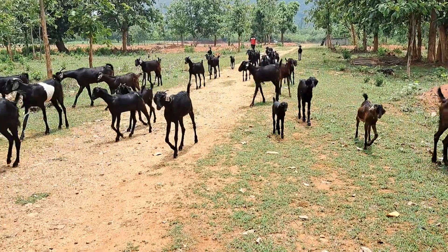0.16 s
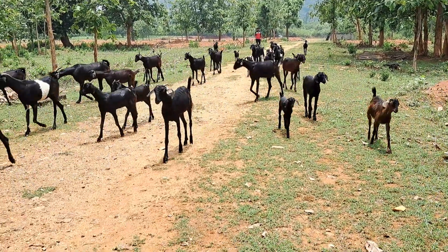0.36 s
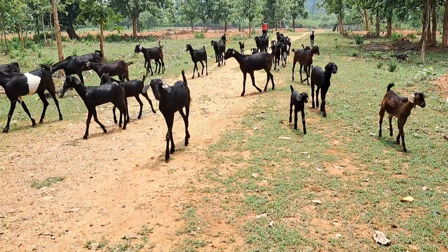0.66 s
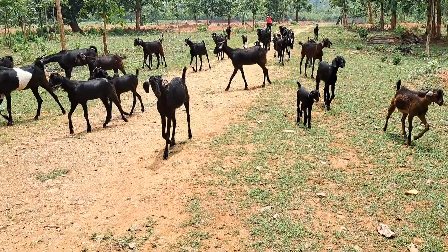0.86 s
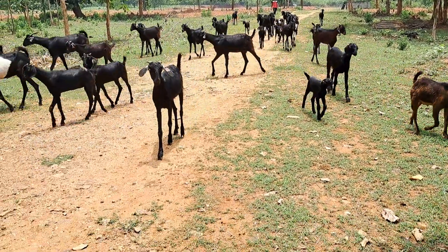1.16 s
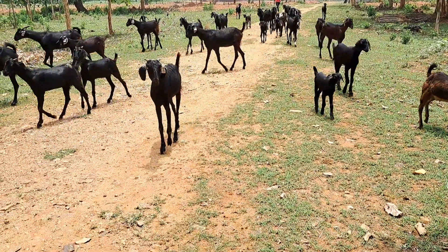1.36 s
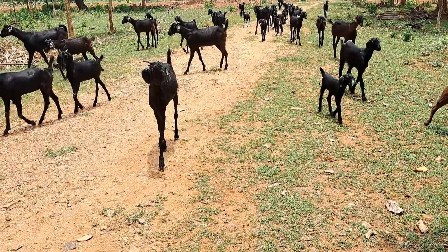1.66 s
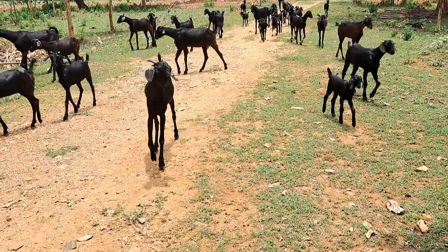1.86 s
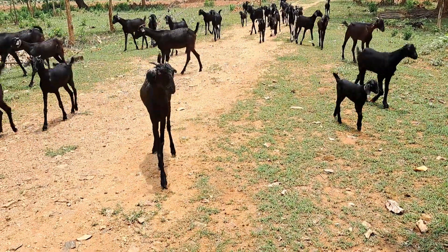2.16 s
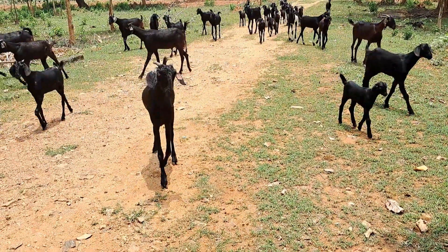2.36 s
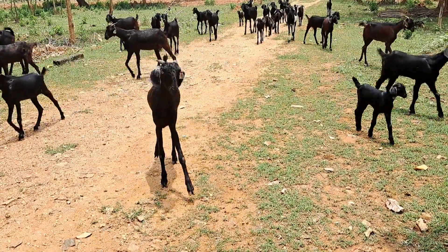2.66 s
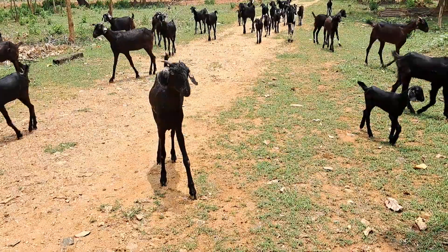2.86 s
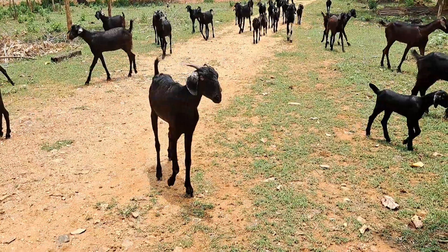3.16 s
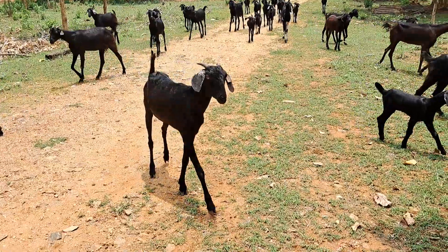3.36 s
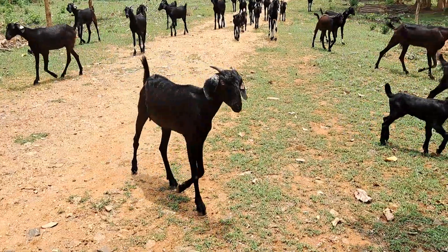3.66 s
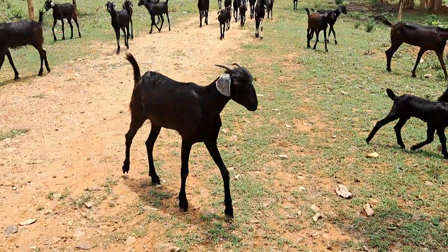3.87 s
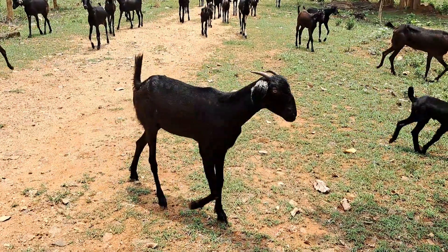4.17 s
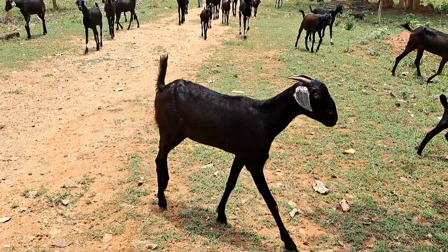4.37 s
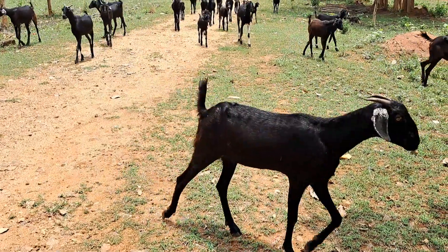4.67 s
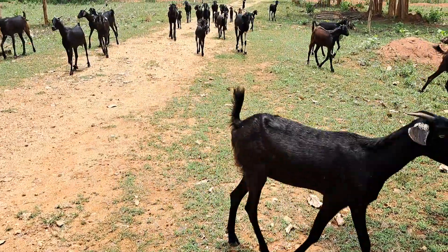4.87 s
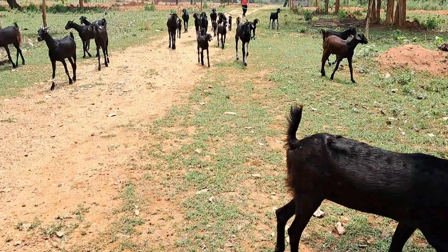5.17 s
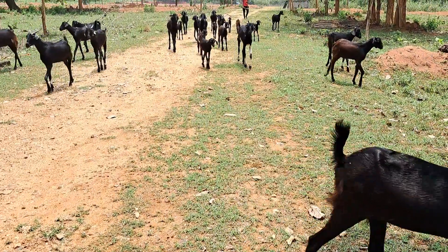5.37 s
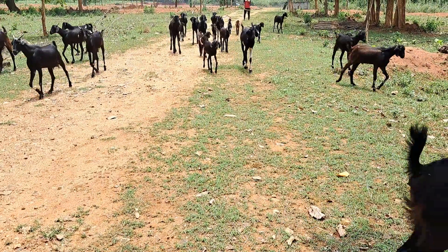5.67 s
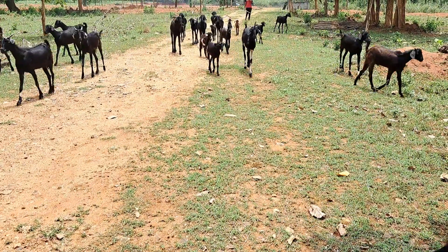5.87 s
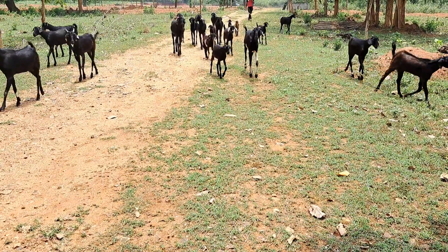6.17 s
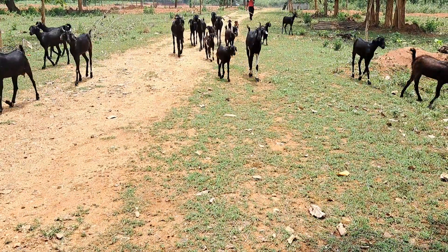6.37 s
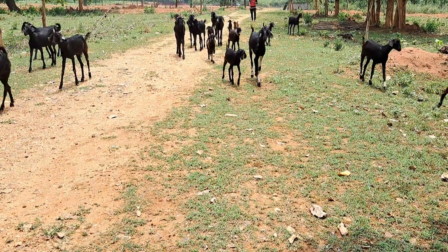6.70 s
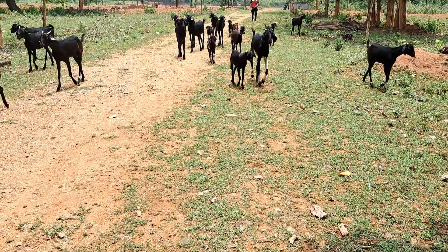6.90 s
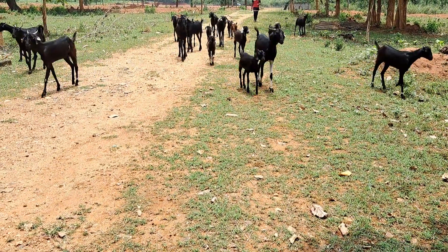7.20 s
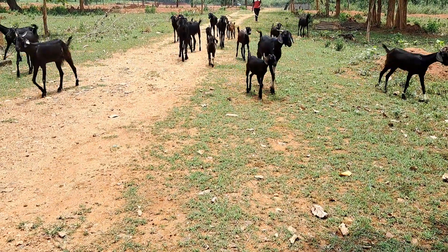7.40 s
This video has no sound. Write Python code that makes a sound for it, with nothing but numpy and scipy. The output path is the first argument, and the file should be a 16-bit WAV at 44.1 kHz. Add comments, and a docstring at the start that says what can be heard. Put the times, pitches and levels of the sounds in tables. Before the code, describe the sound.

Outdoors on a dry dirt track, a herd of goats shuffles past with fine gritty crackle, leg brushes through grass and small snapping stalks. Light wind thumps the stereo microphone early, with soft dull patter and faint bird whistles. A short, quiet, trembling bleat comes just after the middle. Then the footwork grows much closer and louder, with crisp crunches, dull thuds and renewed low rumble.

```python
"""A herd of goats walks along a dry dirt track: filtered grains and noise shuffle, hooves crunch and thud.
Legs brush through grass and leaves as swells of grit noise; dry stalks snap as short ringing bursts.
One goat passes close by with a soft, quavering bleat, harmonics shaped by nose and throat.
Gliding sine tones make birds whistle from the trees, and soft puffs patter in two early runs.
Low noise and single thumps rumble on the two-port microphone: light wind early, later probably handling."""
import sys
import numpy as np
from scipy import signal
from scipy.fft import rfft, irfft, next_fast_len
from scipy.io import wavfile
from scipy.ndimage import uniform_filter1d

SR = 44100
rng = np.random.default_rng(int(sys.argv[2]) if len(sys.argv) > 2 else 0)


def waveform_to_disk(signal):
    """Save audio, clipped to [-1, 1], as 16-bit WAV at the path in sys.argv[1]."""
    frames = np.transpose(np.atleast_2d(signal))
    scaled = np.clip(frames, -1, 1) * 32767
    samples = np.round(scaled).astype(np.int16)
    wavfile.write(sys.argv[1], SR, samples)


N = 332514
TIME = np.arange(N) / SR
HERD_LAG_S = -.00046   # the left port hears the herd earlier

# colour of grit crunching close by: (frequency [Hz], level per frequency [dB])
GRIT = [(710, -20), (1200, -9), (2060, -1), (2980, -0.5), (4360, -2), (4800, -2.5), (6510, -0.5), (7330, 0),
        (8170, -4.5), (9110, -8.5), (9930, -4), (10800, -7), (11900, -4), (15200, -8.5), (16000, -49)]


def from_db(db):
    """Decibels to gain."""
    return 10 ** (np.asarray(db) / 20)


def rms_one(x):
    """Scale to rms 1."""
    return x / np.sqrt(np.mean(x ** 2) + 1e-20)


def evened(x, window_s):
    """Keep the fine grain of a sound but hold its level at 1."""
    power = uniform_filter1d(np.mean(x ** 2, axis=0), max(int(window_s * SR), 8))
    return x / np.sqrt(np.abs(power) + 1e-12)


def in_time(rows):
    """Each column of a curve at every sample."""
    s, *columns = np.transpose(rows)
    return [np.interp(TIME, s, column) for column in columns]


def swell(s, half_s, fade):
    """A smooth rise to 1 at time s and a fall that lasts fade times as long."""
    age = (TIME - s) / half_s
    return np.exp(-np.minimum(np.where(age < 0, age, age / fade) ** 2, 60))


def drift(rate):
    """Slow chance with spread 1, turning at the given number of knots per second."""
    knots = rng.standard_normal(4096)
    return rms_one(np.interp(TIME * rate, np.arange(len(knots)), knots))


def at_bins(points):
    """A table over frequency at every bin of a padded transform."""
    hz, value = np.transpose(points)
    size = next_fast_len(N // 2 + 4096) * 2
    bins_hz = np.linspace(1, SR / 2, size // 2 + 1)
    return np.interp(np.log(bins_hz), np.log(hz), value)


def coloured(x, spectrum):
    """Causal (minimum-phase) filter with the given (Hz, dB) response."""
    cepstrum = irfft(np.log(from_db(at_bins(spectrum))))
    size = len(cepstrum)
    # folding the cepstrum onto its first half makes the response causal
    cepstrum[1:size // 2] *= 2
    cepstrum[size // 2 + 1:] = 0
    return irfft(rfft(x, size) * np.exp(rfft(cepstrum)))[..., :N]


def resonance(x, hz, width_hz):
    """Two-pole resonance with gain 1 on top."""
    r = np.exp(-np.pi * width_hz / SR)
    zeros = np.array([1, 0, -1]) * (1 - r * r) / 2
    poles = [1, -2 * r * np.cos(2 * np.pi * hz / SR), r * r]
    return signal.lfilter(zeros, poles, x + 1e-18)


def placed(x, lag_s):
    """A source off to one side reaches the left port later (earlier if the lag is negative)."""
    return np.array([np.roll(x, int(round(lag_s * SR))), x])


def diffuse(alike, lag_s):
    """Stereo noise, of which a share comes from one direction."""
    alike = np.clip(alike, 0, 1)
    directed = placed(rng.standard_normal(N), lag_s)
    return np.sqrt(alike) * directed + np.sqrt(1 - alike) * rng.standard_normal((2, N))


def scattered(x, scatter_db, decay_s):
    """Open air: only a faint, brief scatter from grass and bodies."""
    age = TIME[:4096]
    scatter = rng.standard_normal((2, len(age))) * np.exp(-age / decay_s)
    scatter = scatter / np.linalg.norm(scatter[0])
    return x + from_db(scatter_db) * signal.fftconvolve(x, scatter, axes=1)[:, :N]


def microphone_rumble():
    """Lumpy low noise at each port that swells and passes, with single low thumps on the ports."""
    # floor of the rumble: (time [s], level [dB])
    floor = [(0.0, -46), (0.57, -47), (0.92, -55), (1.19, -59.5), (1.43, -48), (2.14, -70.5), (4.05, -67.5),
             (4.2, -64), (4.77, -69), (6.17, -50.5), (6.38, -63), (7.54, -56)]
    # swells of low rumble, wind gusts early, from 5.9 s probably handling of the microphone:
    # (time [s], level [dB], half length [s])
    swells = [(0.228, -36.5, 0.077), (0.35, -38.5, 0.047), (.73, -44, .04), (0.587, -36.5, 0.037),
              (1.123, -46, 0.024), (1.274, -43, 0.018), (1.465, -42.5, 0.095), (1.817, -53.5, .03),
              (2.093, -57.5, .03), (2.53, -61, .04), (3.384, -59, 0.027), (3.525, -56.5, 0.05),
              (5.186, -53, .04), (5.57, -51, 0.032), (5.958, -41.5, .09), (6.264, -44, 0.085),
              (6.768, -52, 0.022), (6.896, -50, .025), (7.176, -45.5, 0.023), (7.355, -41.5, 0.055)]
    # which port rumbles harder: (time [s], left minus right [dB])
    rumble_side = [(.2, 0), (.7, 2.5), (1.3, 7.5), (1.8, 3.5), (5.9, 3.5), (7.3, 3)]
    # colour of the rumble: (frequency [Hz], level per frequency [dB])
    rumble_colour = [(18, -46), (32, -11.5), (48, -1), (70, -2), (120, -5.5), (170, -12.5), (300, -19.5),
                     (600, -41), (1500, -47.5)]
    # buffets and soft bumps: (time [s], height [dB], pitch [Hz], width [s], left minus right [dB])
    buffets = [(0.041, -31.5, 80, 0.0093, 11), (0.211, -21.5, 98, 0.0058, -10),
               (0.363, -28, 114, 0.0084, -15), (.59, -31, 79, 0.017, 11), (1.434, -26.5, 92, 0.0053, 17),
               (1.48, -35.5, 73, 0.018, 18), (4.695, -41, 233, 0.0054, 0), (5.826, -33, 247.5, 0.0093, 0)]
    floor_db, = in_time(floor)
    side_db, = in_time(rumble_side)
    power = from_db(floor_db) ** 2
    for s, swell_db, half_s in swells:
        power = power + from_db(swell_db) ** 2 * swell(s, half_s, 0.89)
    rumble = evened(coloured(rng.standard_normal((2, N)), rumble_colour), window_s=0.05)
    out = np.sqrt(power) * rumble * from_db([side_db / 2, -side_db / 2])
    for s, peak_db, hz, width, pan_db in buffets:
        age = TIME - s + np.array([[0], [.0004]])   # a thump reaches the right port just before the left
        thump = np.exp(-(age / width) ** 2) * np.sin(-2 * np.pi * hz * age)
        out = out + from_db(peak_db + pan_db * np.array([[.5], [-.5]])) * thump
    return out


def birds(echo_db, echo_s, waver):
    """Nearly pure whistles that glide and warble, smeared by echoes from the trees."""
    # whistles: (start [s], length [s], first pitch [Hz], last pitch [Hz], level before the fade [dB],
    #            warble [share of pitch])
    whistles = [(.14, 0.13, 2130, 2240, -44.5, 0.024), (0.337, .08, 1990, 1970, -54, 0.024),
                (2.163, .085, 4600, 4460, -50.5, .006), (2.375, 0.13, 4280, 4250, -50, 0.0067),
                (2.575, 0.068, 2980, 3230, -46, 0.0065), (2.621, .13, 3600, 3520, -40, .04),
                (5.48, .09, 3790, 3235, -44, 0.028), (5.684, .045, 2580, 2520, -53, .012),
                (6.393, .075, 4190, 4240, -41.5, 0.0034)]
    attack_s, release_s, warbles_per_s = 0.0094, 0.021, 24
    fade_db_per_s = 80   # a note starts strong and dies away
    song = np.zeros(N)
    unsteady = 1 + waver * drift(200)
    for s, length, first_hz, last_hz, level_db, warble in whistles:
        on = (TIME > s) & (TIME < s + length)
        age = TIME[on] - s
        glide_hz = np.interp(age, [0, length], [first_hz, last_hz])
        hz = glide_hz * (1 + warble * np.cos(2 * np.pi * warbles_per_s * age)) * unsteady[on]
        shape = np.minimum(age / attack_s, 1) * np.minimum((length - age) / release_s, 1)
        tone = np.sin(2 * np.pi * np.cumsum(hz) / SR)
        song[on] += from_db(level_db - fade_db_per_s * age) * shape * tone
    age = TIME[:SR // 2]
    trees = rng.standard_normal((2, len(age))) * np.exp(-age / echo_s)
    echoes = signal.fftconvolve(song[None], trees / np.linalg.norm(trees[0]), axes=1)[:, :N]
    return placed(song, HERD_LAG_S) + from_db(echo_db) * echoes


def patter(decay_s):
    """Soft contacts in runs that speed up, each a short dull puff of decaying noise."""
    # quick runs of dull knocks: (first [s], last [s], first gap [s], level before colouring [dB])
    runs = [(.182, .9, .076, -26), (1.525, 1.75, .053, -26)]
    # colour of one knock: (frequency [Hz], level per frequency [dB])
    knock = [(100, -31), (220, 2.5), (330, 3), (480, -11.5), (700, -15), (1050, -11.5), (1600, -19.5),
             (3000, -22.5)]
    hurry = 0.96   # each gap is this share of the one before
    out, age = np.zeros(N), TIME[:2048]
    for first, last, gap, level_db in runs:
        times = first + np.append(0, np.cumsum(gap * hurry ** np.arange(16)))
        for s in times[times < last]:
            at = int(s * SR)
            puff = rng.standard_normal(len(age)) * np.exp(-age / decay_s)
            out[at:at + len(age)] += from_db(level_db) * puff
    return placed(coloured(out, knock), 0)


def bleat(jitter, breath_db):
    """The call starts as a hum through the nose, then the mouth opens and the voice shakes."""
    # course of the bleat at the crests of its quaver:
    # (time [s], pitch [Hz], level [dB], mouth opening [0-1])
    course = [(4.29, 278, -46, 0), (4.355, 221.3, -37.5, 0.03), (4.405, 263.3, -47, 0),
              (4.46, 304, -52.5, 1), (4.59, 356, -49, 0.86), (4.705, 378, -49.5, 0.85), (4.82, 360, -50, 1),
              (4.93, 280, -59, 0.7), (4.98, 282.5, -66, 0.48)]
    # the goat's open throat: (resonance [Hz], width [Hz], level [dB])
    throat_resonances = [(355, 170, -2), (680, 400, -0.5), (1157, 205, 7.5), (2460, 210, 5.5)]
    crest_s, period_s = 4.59, .115   # one crest of the shaking voice, and the time to the next
    sag, dip_db = .18, 15   # between crests the pitch sags by this share and the level dips
    hz, level_db, mouth = in_time(course)
    slack = np.sin(np.pi * (TIME - crest_s) / period_s) ** 2
    hz = hz * (1 - sag * slack)
    level_db = level_db - dip_db * slack
    phase = 2 * np.pi * np.cumsum(hz * (1 + jitter * drift(260))) / SR
    folds = sum(np.cos(k * phase) / k ** 0.7 for k in np.arange(1, 13))
    # breath noise pulses with the vocal folds
    folds = folds + from_db(breath_db) * rng.standard_normal(N) * (1 + np.cos(phase))
    # each resonance acts twice: steep sides leave dark valleys between them
    throat = rms_one(sum(from_db(db) * resonance(resonance(folds, f, width), f, width)
                         for f, width, db in throat_resonances))
    nose = rms_one(np.sin(phase) + from_db(-15) * np.sin(2 * phase) + from_db(-25.0) * throat)
    mouth = np.clip(mouth, 0, 1)
    sounding = (TIME > course[0][0]) & (TIME < course[-1][0])
    voice = mouth * throat + (1 - mouth) * nose
    return placed(sounding * from_db(level_db) * voice, -0.00019)


def snaps(crack_s, tail_s, tail_db, ring_db, width_hz):
    """A stalk breaks with a broad crack, rings for a moment at its own pitch and scatters crumbs."""
    # dry stalks and pebbles snapping: (time [s], peak before colouring [dB], pitch [Hz])
    breaks = [(0.067, -30.5, 7000), (0.1408, -31, 6200), (0.2342, -32, 2600), (0.4234, -31, 5700),
              (0.597, -26, 2500), (0.823, -34.5, 4000), (1.268, -29, 6310), (1.2837, -30, 6310),
              (1.3236, -34, 6750), (1.824, -31, 6200), (1.9121, -31, 3600), (1.9435, -29, 6090),
              (2.1328, -33, 2800), (2.236, -24.5, 7550), (2.48, -30, 6440), (2.813, -34, 7540),
              (3.001, -25.5, 2160), (3.162, -29, 4900), (3.399, -24, 5800), (3.42, -26, 5100),
              (3.478, -32, 2600), (3.982, -31, 5900), (4.152, -27, 2720), (4.1698, -21.5, 5130),
              (4.217, -22, 6540), (4.9856, -37, 2590), (5.459, -24.5, 6560), (6.0581, -26, 6200),
              (6.176, -31, 6680), (6.2068, -18.5, 6450), (6.6436, -25.5, 6600), (6.7434, -21, 6330),
              (6.8414, -21, 6540), (6.912, -26.5, 7200), (6.9322, -24, 6900), (6.9603, -19, 6540),
              (7.2473, -15.5, 3250)]
    out, age = np.zeros(N), TIME[:2048]
    for s, peak_db, hz in breaks:
        envelope = np.exp(-age / crack_s) + from_db(tail_db) * np.exp(-age / tail_s)
        burst = rng.standard_normal(len(age)) * envelope
        snap = burst + from_db(ring_db) * resonance(burst, hz, width_hz)
        at = int(s * SR)
        out[at:at + len(age)] += (from_db(peak_db) * snap / np.abs(snap).max())[:N - at]
    out = coloured(out, [(300, -23), (1200, -8.0), (2200, -5.5), (7000, -3.0), (9000, -7), (16000, -11)])
    return from_db(8) * placed(out, HERD_LAG_S)


def grains(per_s, spread_db):
    """Random clicks, most small and a few large."""
    sizes_db = spread_db * np.minimum(rng.exponential(1, N), 4)
    sizes = from_db(sizes_db) * rng.choice([-1, 1], N)
    return sizes * (rng.random(N) < per_s / SR)


def crunch(per_s, spread_db, hiss_db, crackle_db, patchy_db):
    """Grit breaking: grains in separate bands over a hiss of finer dust, the colour always shifting."""
    edges_hz, out = np.geomspace(1000, 17000, num=11), 0
    dust = [diffuse(0.056, HERD_LAG_S) for _ in range(2)]
    for k, (low, high) in enumerate(zip(edges_hz, edges_hz[1:])):
        cracks = placed(rms_one(grains(per_s, spread_db)), HERD_LAG_S + rng.normal(0, .00003))
        band_pass = signal.butter(2, [low, high], "band", fs=SR, output="sos")
        band = signal.sosfilt(band_pass, cracks + from_db(hiss_db) * dust[k % 2])
        out = out + band * from_db(patchy_db * drift(45))
    # a crumb gives way all at once, and its fragments settle over a few milliseconds
    settling = np.exp(-1 / (.004 * SR))
    collapses = signal.lfilter([1], [1, -settling], grains(110, 3) ** 2 + 1e-18)
    return rms_one(out * np.sqrt(1 + from_db(crackle_db) ** 2 * collapses / collapses.mean()))


def soil():
    """Dull, lumpy noise of hooves pushing earth and crushing clods."""
    # colour of trodden earth: (frequency [Hz], level per frequency [dB])
    earth_colour = [(90, -8.5), (170, -2.5), (260, 1), (400, -4), (580, 0.5), (800, -4.5), (1050, -2.5),
                    (1350, -8), (1800, -8), (3000, -70)]
    clods = placed(rms_one(grains(per_s=160, spread_db=2.5)), HERD_LAG_S)
    earth = clods + from_db(0.5) * diffuse(0.19, HERD_LAG_S)
    return evened(coloured(earth, earth_colour), window_s=0.14)


def footwork():
    """Powers of grit and soil, and the crispness: the steady shuffle plus every brushing leg."""
    # steady shuffle of the whole herd, louder as animals come close:
    # (time [s], grit level [dB], dull scuffing of soil [dB])
    herd = [(0.0, -53, -71), (0.44, -51.5, -58), (1.7, -52.5, -64), (2.29, -50.5, -67.5),
            (2.67, -49.5, -61), (3.84, -54.5, -68), (4.09, -50, -66), (4.37, -51, -58.5), (4.64, -52, -58),
            (5.23, -51, -68.5), (5.84, -52, -65), (5.98, -45, -46), (6.07, -39, -53.5),
            (6.51, -45.5, -57.5), (7.05, -42, -54), (7.2, -51, -47), (7.39, -45, -63), (7.54, -52, -72)]
    # a leg brushes through grass and loose grit:
    # (time [s], grit level [dB], half length [s], soil level [dB], crispness [dB])
    brushes = [(0.153, -50.5, 0.05, -78, -7), (0.702, -50, 0.041, -63, 1), (1.686, -52, 0.023, -60, 8),
               (1.974, -45.5, 0.05, -62, -2), (2.135, -42.5, 0.031, -57.5, -18),
               (2.25, -47.5, 0.038, -73, 6.5), (2.404, -53.5, 0.047, -76, 11.5),
               (2.643, -50.5, 0.075, -63, 3), (2.876, -50.5, 0.023, -63, -1),
               (3.156, -47.5, 0.051, -61.5, 0.5), (3.297, -45.5, 0.043, -64.5, -7),
               (3.53, -46.5, 0.031, -73, -1), (4.002, -42.5, 0.033, -52, -12),
               (4.092, -40.5, 0.028, -58, 0.5), (4.195, -39.5, 0.031, -51, -6), (4.549, -48, 0.054, -73, 1),
               (4.795, -51, 0.12, -56.5, -6), (5.209, -45.5, 0.034, -56.5, 3.5),
               (5.454, -46.5, 0.043, -61, -2), (5.825, -42.5, 0.036, -50.5, 0),
               (5.937, -35, 0.057, -46, -2), (6.047, -33.5, 0.053, -43, -4), (6.19, -31.5, 0.037, -41, 0.5),
               (6.309, -38, 0.024, -52, -12), (6.528, -40, 0.068, -50, 1.5), (6.642, -43, 0.011, -59, 8),
               (6.768, -35.5, 0.038, -49.5, -7), (6.844, -37.5, 0.032, -51, -2),
               (7.122, -30.5, 0.056, -43.5, -21), (7.336, -40, 0.068, -50, -18)]
    brush_fade = 1.16   # a brush takes this much longer to fade than to swell
    grit_db, soil_db = in_time(herd)
    grit, earth = from_db(grit_db) ** 2, from_db(soil_db) ** 2
    crisp = grit * from_db(-0.5)   # the steady shuffle is a little dull in the top octave
    for s, brush_db, half_s, scuff_db, crisp_db in brushes:
        shape = swell(s, half_s, brush_fade)
        power = shape * from_db(brush_db) ** 2
        grit = grit + power
        earth = earth + shape * from_db(scuff_db) ** 2
        crisp = crisp + power * from_db(crisp_db)
    return grit, earth, crisp / grit


def shuffling():
    """Many feet at once: quiet stretches are the far herd, loud ones the animals close by."""
    # colour of grit at a distance: (frequency [Hz], level per frequency [dB])
    far_grit = [(710, -5.5), (1200, -12.5), (1510, -6.5), (2620, 0), (3550, 0), (4410, -1.5), (5410, 1),
                (6160, 1), (7330, -2), (9310, -9), (11600, -4.5), (15200, -7.5), (16000, -28)]
    grit_power, soil_power, crispness = footwork()
    near = np.clip((10 * np.log10(grit_power) + 48) / 12, 0, 1)
    close = crunch(per_s=700, spread_db=1.0, hiss_db=3.5, crackle_db=-2.5, patchy_db=2.0)
    close = evened(coloured(close, GRIT), window_s=0.16)
    far = crunch(per_s=400, spread_db=4.0, hiss_db=8.5, crackle_db=-4.5, patchy_db=2.5)
    far = evened(coloured(far, far_grit), window_s=0.072)
    grit = np.sqrt(grit_power) * (np.sqrt(near) * close + np.sqrt(1 - near) * far)
    top = signal.sosfilt(signal.butter(1, 9000, "high", fs=SR, output="sos"), grit)
    return grit + (crispness - 1) * top + np.sqrt(soil_power) * soil()


def hoof_falls():
    """A hoof presses in with a short thud, and the grit under it goes on crumbling at a pitch of its own."""
    # single hoof falls: (time [s], crunch level [dB], rise [s], decay [s], thud level [dB],
    #                     strongest pitch [Hz])
    steps = [(0.236, -42.5, .003, 0.0085, -44.5, 4200), (0.601, -31.5, 0.0019, 0.035, -50, 5400),
             (.925, -31.5, 0.01, 0.026, -47.5, 5420), (1.084, -41.5, 0.0087, 0.013, -72, 6200),
             (1.28, -36.5, 0.024, 0.053, -55.5, 6040), (1.464, -43.5, 0.0074, 0.035, -74, 2780),
             (1.826, -41, 0.0027, 0.039, -67, 6000), (2.084, -41, 0.0024, 0.016, -55, 2600),
             (2.534, -36.5, 0.0023, 0.021, -50, 5770), (3.001, -43, 0.00081, 0.0056, -49, 2200),
             (3.079, -42, .001, 0.012, -53.5, 4300), (3.128, -46, 0.019, 0.017, -66, 2800),
             (3.769, -44, 0.0019, 0.0079, -52.5, 2560), (3.843, -36, 0.0014, 0.015, -53, 5370),
             (3.983, -31, 0.0048, 0.0025, -46.5, 5900), (4.101, -38.5, 0.0081, 0.021, -62, 4770),
             (4.171, -32, .003, 0.014, -55, 3130), (5.008, -42, .003, 0.022, -70, 6230),
             (5.156, -46, 0.0055, 0.012, -54, 1490), (5.24, -46, 0.0058, 0.0064, -69, 2800),
             (5.535, -36.5, .001, 0.047, -50.5, 1980), (5.578, -40.5, .012, 0.036, -58, 5640),
             (5.916, -32.5, 0.027, 0.0092, -44, 3240), (6.11, -28, 0.0046, 0.0039, -62, 6440),
             (6.178, -27, .003, 0.0096, -40, 2120), (6.557, -34, 0.0034, 0.008, -43, 4450),
             (7.072, -32.5, 0.0096, 0.0055, -34.5, 5170), (7.17, -35, 0.0091, 0.1, -60, 3430),
             (7.246, -34, 0.00068, 0.0086, -28.5, 2850), (7.509, -35, 0.0022, 0.16, -53.5, 6200)]
    out = np.zeros((2, N))
    earth = evened(resonance(soil(), 620, 500), window_s=.008)
    grit = coloured(crunch(per_s=500, spread_db=3.5, hiss_db=-2, crackle_db=3, patchy_db=2.5), GRIT)
    for s, crunch_db, rise, decay, thud_db, hz in steps:
        span = slice(max(int((s - .1) * SR), 0), int((s + .4) * SR))
        age = TIME[span] - s
        shape = np.exp(-np.where(age < 0, (age / rise) ** 2, age / decay))
        crumbs = grit[:, span] + from_db(5.0) * resonance(grit[:, span], hz, 680)
        crumbs = evened(crumbs, window_s=0.012)
        out[:, span] += shape * (from_db(crunch_db) * crumbs + from_db(thud_db) * earth[:, span])
    return out


def scene():
    """Feet, voice, birds and low rumble at the two ports."""
    # between the two microphone ports: (frequency [Hz], left minus right [dB])
    ports = [(60, 7), (110, 2.5), (200, -2), (380, -2), (700, 0.5), (1290, -3.5), (2380, -4.5), (4400, -6),
             (8120, -7.5), (11000, -1), (15000, 4)]
    stalks = snaps(crack_s=.0011, tail_s=.006, tail_db=-18, ring_db=10, width_hz=700)
    feet = scattered(shuffling() + hoof_falls() + stalks, scatter_db=-19, decay_s=.014)
    voice = bleat(jitter=.018, breath_db=-8)
    song = birds(echo_db=-4, echo_s=.08, waver=.006)
    left, right = feet + patter(decay_s=0.0086) + voice + song + microphone_rumble()
    # each port takes half of the difference
    left = coloured(left, [(hz, db / 2) for hz, db in ports])
    right = coloured(right, [(hz, -db / 2) for hz, db in ports])
    return np.array([left, right])


def record(dry):
    """The deepest rumble is rolled off and the top is cut steeply."""
    cutoff_hz = 16200
    dry = signal.sosfilt(signal.butter(2, 32, "high", fs=SR, output="sos"), dry)
    return signal.sosfilt(signal.ellip(10, .1, 80, cutoff_hz, fs=SR, output="sos"), dry)


dry = scene()
out = record(dry)
waveform_to_disk(out)
```